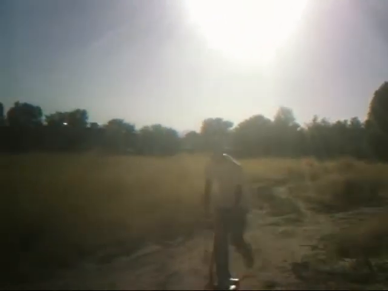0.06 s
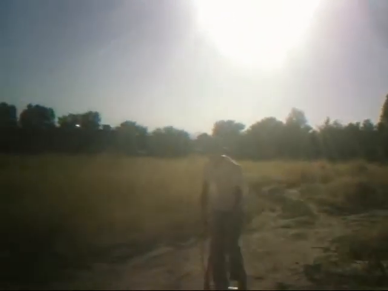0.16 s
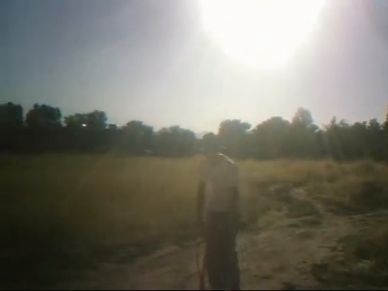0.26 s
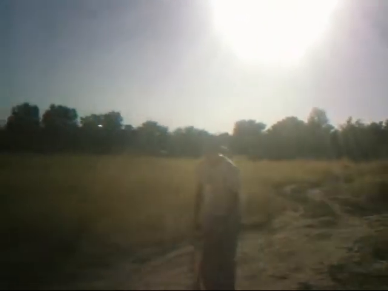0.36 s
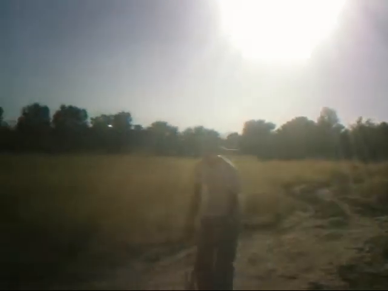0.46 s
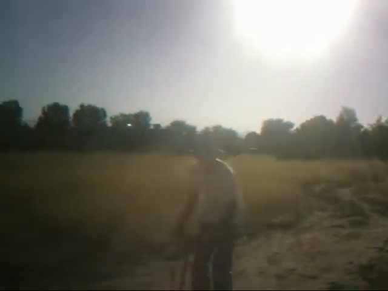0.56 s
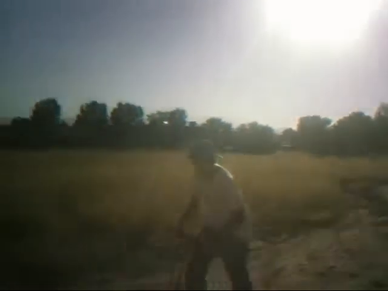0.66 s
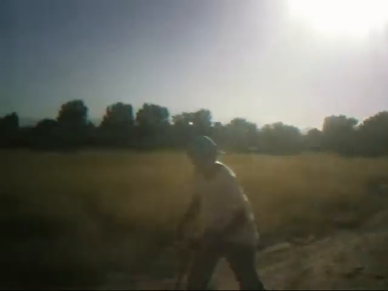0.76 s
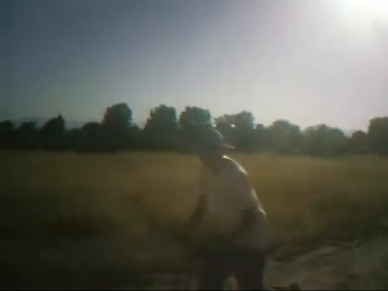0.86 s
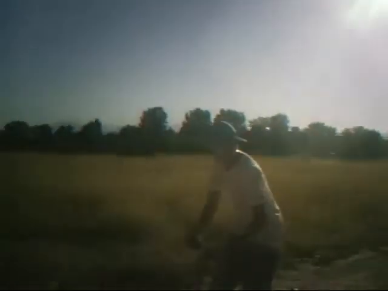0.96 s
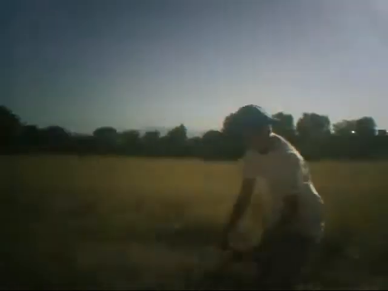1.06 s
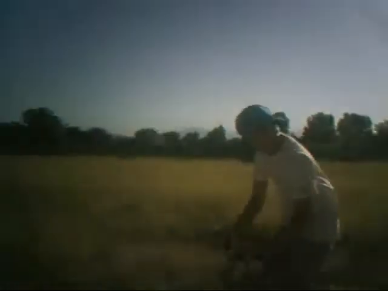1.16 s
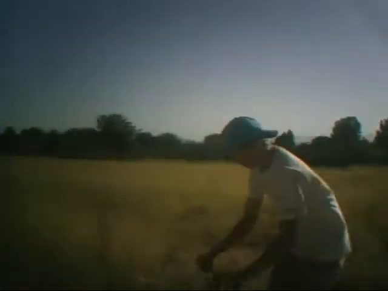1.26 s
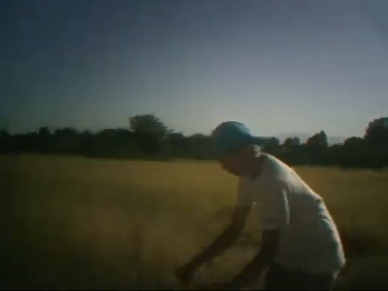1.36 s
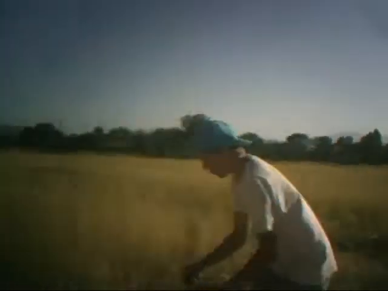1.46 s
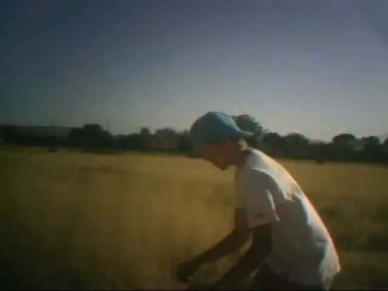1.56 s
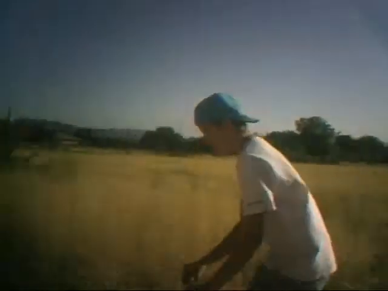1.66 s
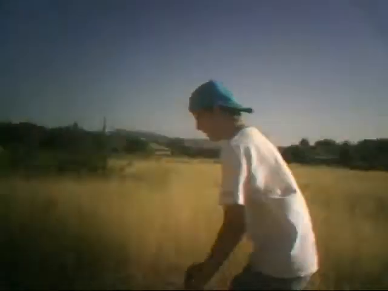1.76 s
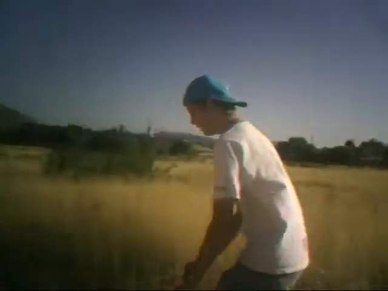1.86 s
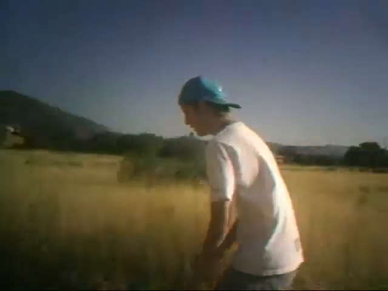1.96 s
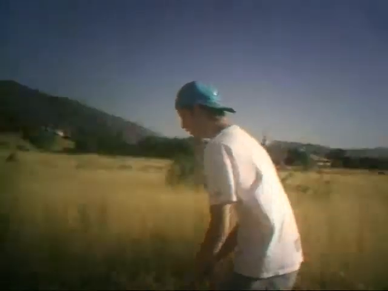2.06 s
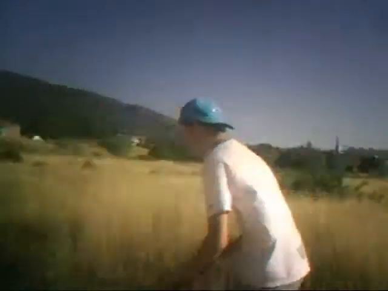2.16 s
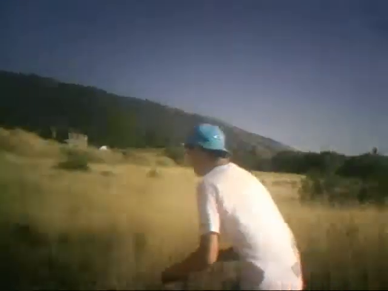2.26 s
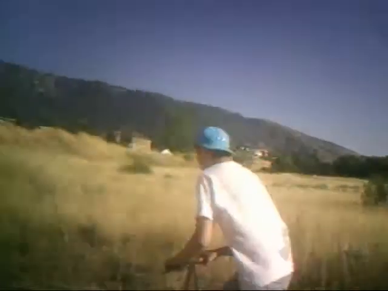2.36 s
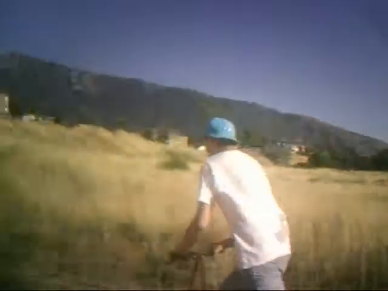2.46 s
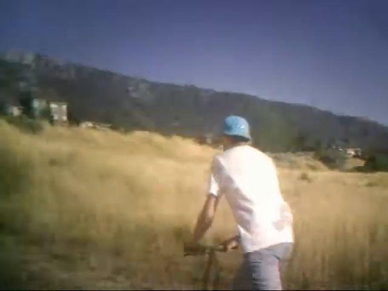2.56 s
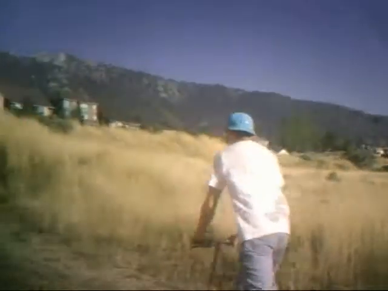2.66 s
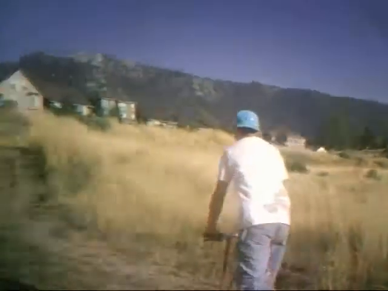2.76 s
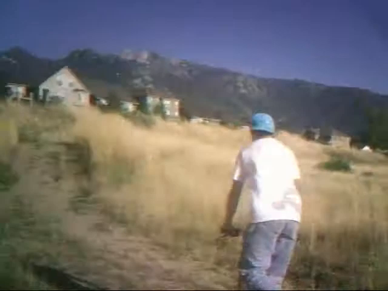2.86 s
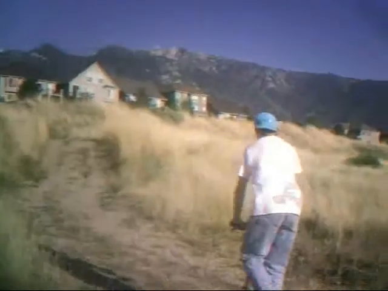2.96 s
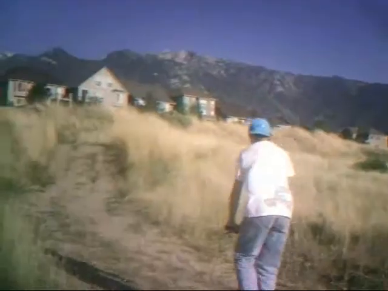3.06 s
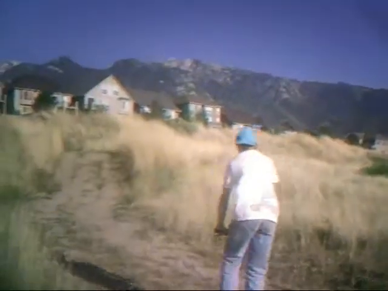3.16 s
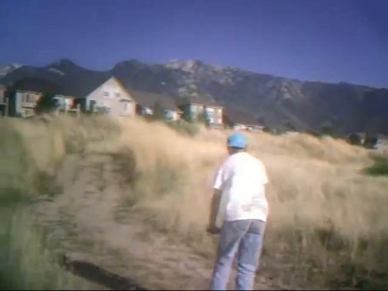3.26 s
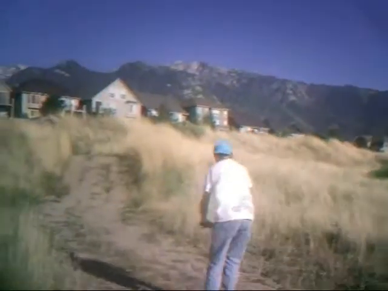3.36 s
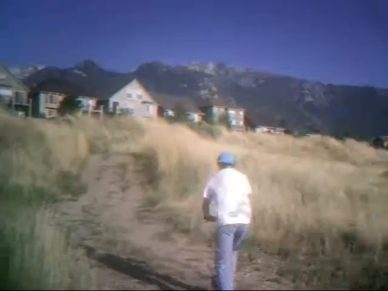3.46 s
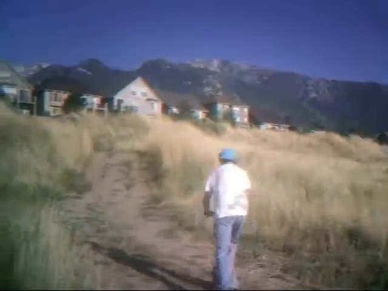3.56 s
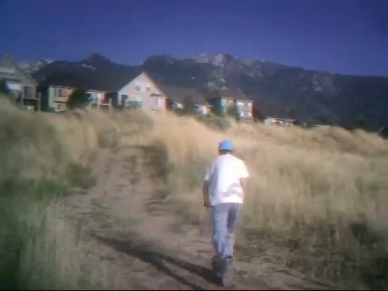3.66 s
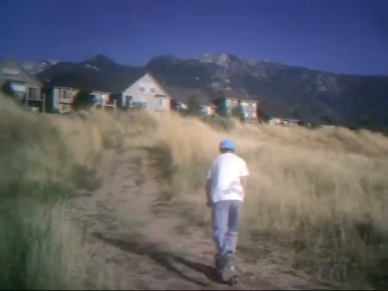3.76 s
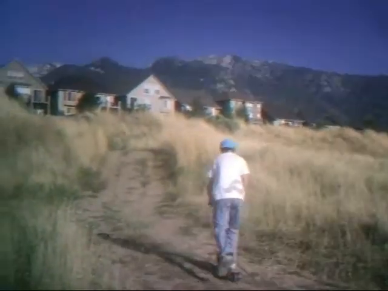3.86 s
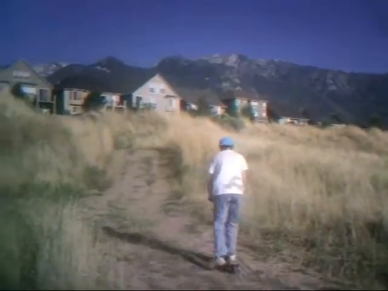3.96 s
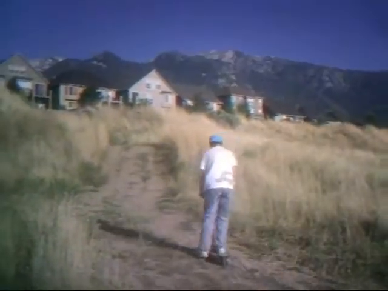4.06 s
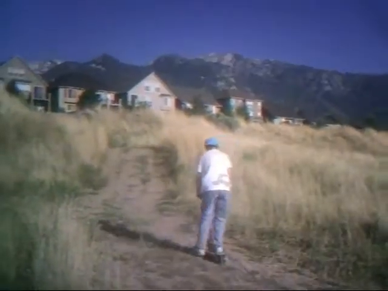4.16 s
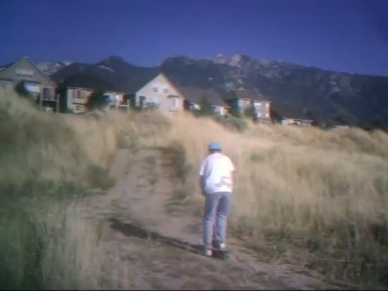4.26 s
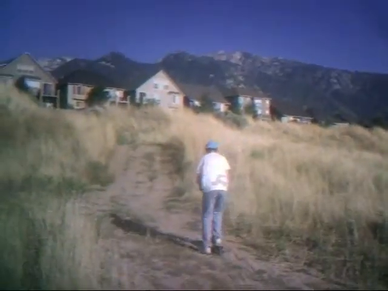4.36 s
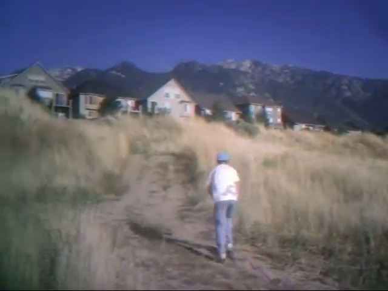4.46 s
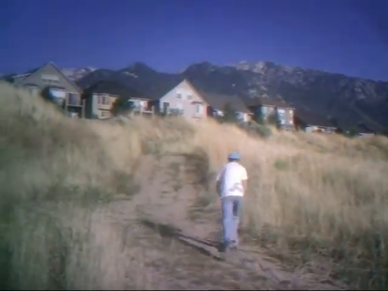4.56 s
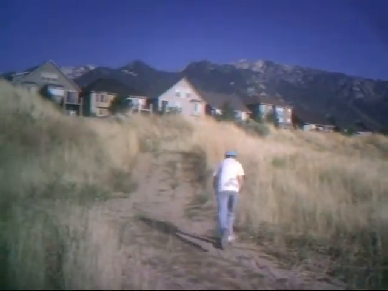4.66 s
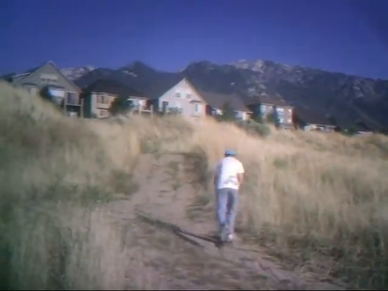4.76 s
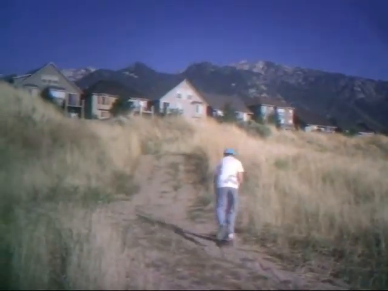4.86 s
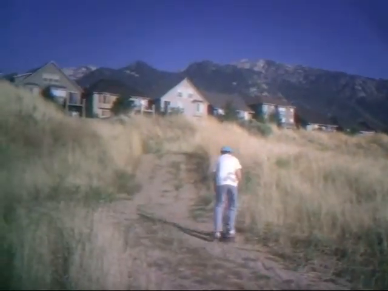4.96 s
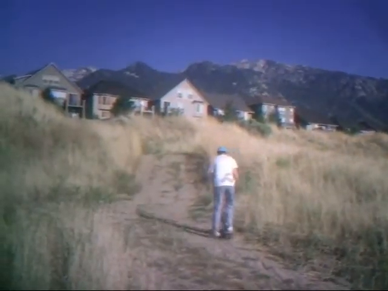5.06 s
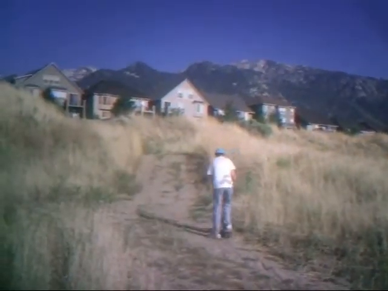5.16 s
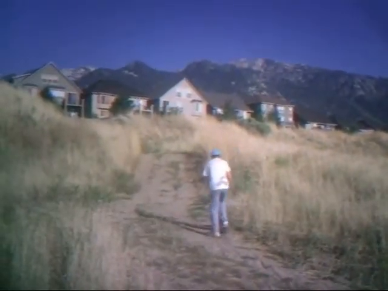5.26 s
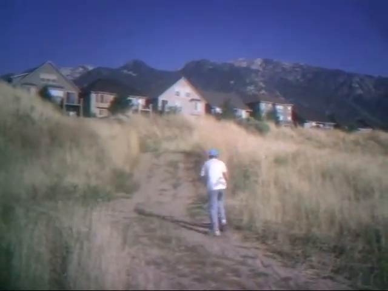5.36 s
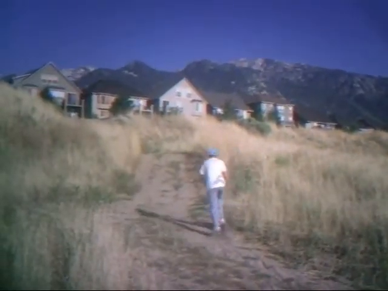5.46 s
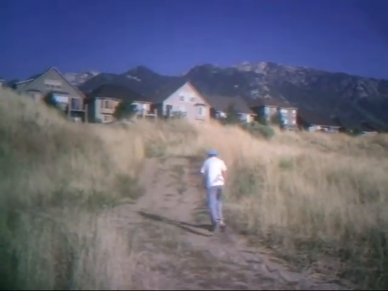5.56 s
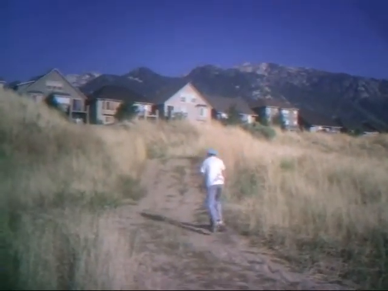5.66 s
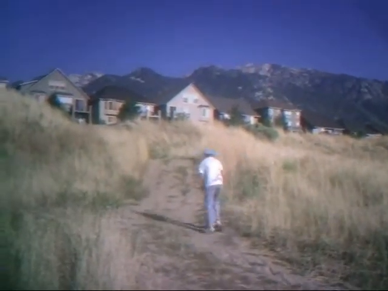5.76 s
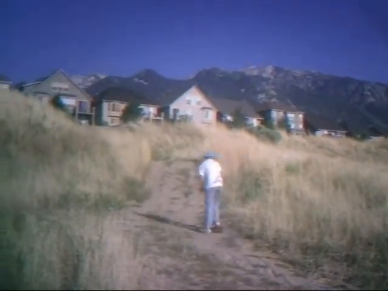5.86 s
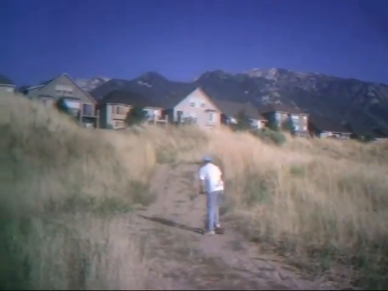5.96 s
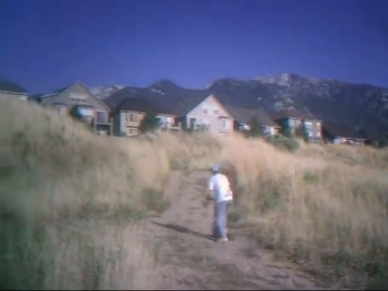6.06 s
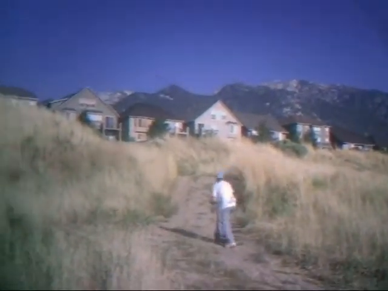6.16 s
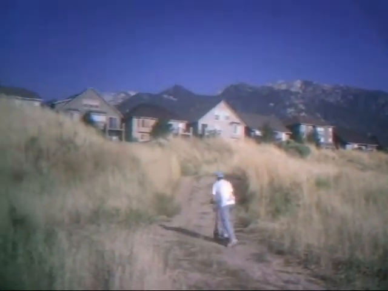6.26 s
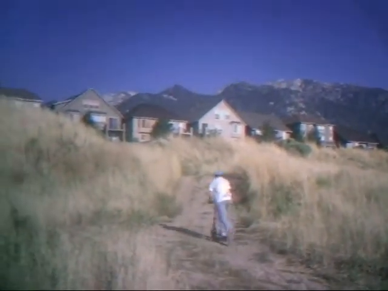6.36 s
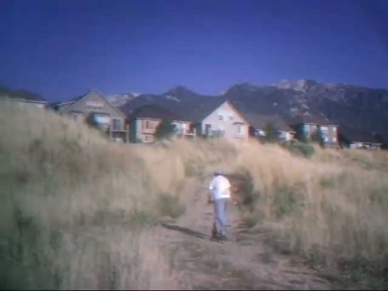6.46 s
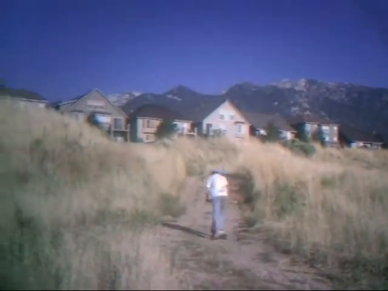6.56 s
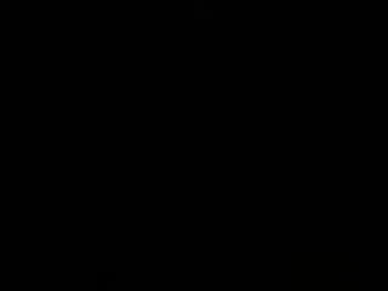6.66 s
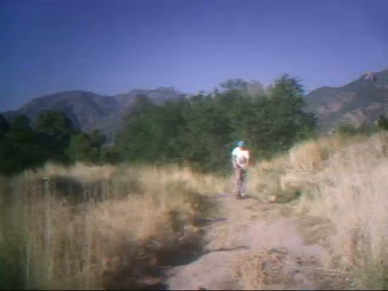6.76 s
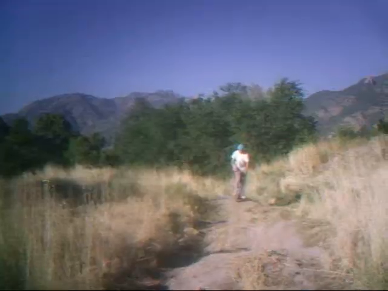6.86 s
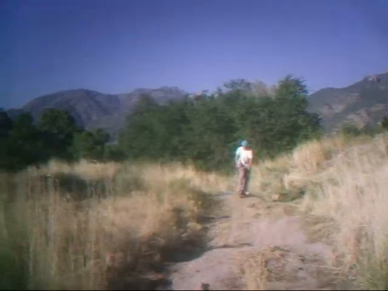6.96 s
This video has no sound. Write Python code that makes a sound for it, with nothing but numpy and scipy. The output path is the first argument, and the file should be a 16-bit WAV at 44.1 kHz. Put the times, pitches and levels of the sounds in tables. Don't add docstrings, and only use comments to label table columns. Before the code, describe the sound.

A small scooter rattles and crunches close past on a stony dirt track, then recedes under a propeller plane's falling drone and buffeting wind.

```python
import sys
import numpy as np
from scipy import signal
from scipy.io import wavfile

SR = 44100
rng = np.random.default_rng(int(sys.argv[2]) if len(sys.argv) > 2 else 0)


def invert_db(level):
    return 10 ** (np.asarray(level, dtype=float) / 20)


def transcribe(signal):
    frames = np.atleast_2d(signal).T
    limited = np.clip(frames, -1, 1)
    pcm = np.round(limited * 32767).astype(np.int16)
    wavfile.write(sys.argv[1], SR, pcm)


N = 308700
T = np.arange(N) / SR
START_S = 6.8243

# t/s, peak level/dB, ring f/Hz
RUT_KNOCKS = [(0.781, -17.5, 540), (0.802, -19, 774), (0.818, -3, 486), (0.835, 0.5, 389), (0.844, -9, 730),
              (0.853, -3, 732), (0.87, -3.5, 436), (0.896, -14.5, 520), (0.912, -13, 590), (0.997, -8, 597),
              (1.006, -7, 433), (1.051, -7.5, 558), (2.417, -2, 429), (2.439, -7, 476),
              (2.461, -8.5, 500.6), (2.477, -15, 518), (2.494, -8, 461), (2.511, -9, 467),
              (2.544, -20, 534)]
# t/s, peak level/dB, ring f/Hz
STONE_KNOCKS = [(0.254, -24, 800), (0.422, -22, 380), (0.701, -10, 362), (1.354, -31, 590),
                (1.558, -3.5, 533), (1.614, -18, 626), (1.699, -8.5, 594), (1.793, -14, 574),
                (1.851, -2.5, 591), (1.865, -20, 622), (1.939, -11.5, 730), (1.972, -11, 565),
                (2.253, -13, 740), (2.319, -16, 738), (2.607, -18, 587), (2.7, -7.5, 620),
                (2.759, -18, 647), (2.879, -25, 610), (2.989, -15, 584), (3.843, -18.5, 450),
                (3.469, -24, 448.4), (3.594, -14.5, 343), (3.656, -18, 450), (3.694, -19, 480),
                (4.253, -29, 629), (4.655, -21, 519.5), (4.985, -27, 920), (5.404, -20, 454),
                (5.756, -24.5, 519), (6.37, -23, 357)]


def evened(x):
    return x / np.sqrt(np.mean(x ** 2) + 1e-20)


def columns(rows):
    s, *values = np.transpose(rows)
    return [np.interp(T, s, v) for v in values]


def add(mix, s, sound):
    part = mix[round(s * SR):][:len(sound)]
    part += sound[:len(part)]


def bell(centre_s, width_s, t=T):
    return np.exp(-((t - centre_s) / width_s) ** 2)


def resonate(x, hz, width):
    return signal.lfilter(*signal.iirpeak(hz, hz / width, SR), x)


def body(x, modes):
    total = 0
    for hz, width, db in modes:
        once = resonate(x, hz, 1.7 * width)
        total = total + invert_db(db) * resonate(once, hz, 1.7 * width)
    return evened(total)


def wander(hz):
    low_pass = signal.butter(2, hz, fs=SR, output="sos")
    return evened(signal.sosfilt(low_pass, rng.standard_normal(N)))


def decay(x, fall_s):
    return signal.lfilter([1], [1, -np.exp(-1 / (fall_s * SR))], x)


def stones(per_s, spread_db, scrape_s):
    size = invert_db(spread_db * np.minimum(rng.exponential(1, N), 4))
    struck = rng.random(N) < per_s / SR
    return evened(decay(size * struck, scrape_s))


def jolts():
    s, db, hz = np.transpose(RUT_KNOCKS + STONE_KNOCKS)
    at = np.round(s * SR).astype(int)
    bend, every = np.zeros(N), np.zeros(N)
    bend[at] = invert_db(db) * np.clip((620 - hz) / 219, 0, 1)
    every[at] = invert_db(db)
    shake_s, spray_s = 0.02, 0.0058
    spray = every - 0.76 * bend
    return decay(bend, shake_s), decay(every, shake_s), decay(spray, spray_s)


def rolling():
    # t/s, nearness level/dB, looseness of the dirt level/dB, flexing of the deck level/dB
    course = [(0, -12.5, 4, 1), (.4, -12.5, 3.5, -2), (.65, -8, 4, 1), (1.0, -2, 1, 2), (1.45, 0.5, -2, -1),
              (2.15, -3, 2, 3.5), (2.5, -2, 0, 2.5), (2.9, -3.5, 2, -3.5), (3.3, -7.5, 0.5, -1.5),
              (3.65, -8, 2, 1), (4.08, -10.5, -3.5, -6), (4.4, -10, 1.5, 0), (4.8, -18, -2.5, 2),
              (5.2, -19.5, 1.5, 2), (5.8, -20, -1, -0.5), (6.22, -17.5, 3, 2), (6.45, -19.5, -4, 3.5),
              (6.73, -21.5, -10, -3)]
    # f/Hz, width/Hz, level/dB
    boom_modes = [(353, 190, -3), (427.4, 145, 1)]
    # f/Hz, width/Hz, level/dB
    ring_modes = [(534.4, 29.5, -3), (590, 32.3, 2.5), (623.7, 22.5, 0)]
    # f/Hz, width/Hz, level/dB
    stem_modes = [(712, 51, 1), (752.4, 46, 7.5), (806, 25, -19)]
    # f/Hz, width/Hz, level/dB
    crunch_modes = [(900, 420, 6.5), (1174, 260, 6.5), (1288, 104, 1)]
    # f/Hz, width/Hz, level/dB
    rim_modes = [(1500, 62, 1.5), (1637, 170, -0.5)]
    # f/Hz, width/Hz, level/dB
    grit_modes = [(2380, 1130, 6), (2746, 185, 1), (3020, 130, 3.5), (3373, 28, 6)]
    near_db, loose_db, flex_db = columns(course)
    bend, shake, spray = jolts()

    def strength(nearest_db, near_share, loose_share, jolt_db, jolt):
        level_db = nearest_db + near_share * near_db + loose_share * loose_db
        return invert_db(level_db + 0.69 * wander(23.7)) + invert_db(jolt_db) * jolt

    boom = strength(-27.5, 0.68, 0.02, -18, bend) * invert_db(flex_db)
    ring = strength(-22.5, 1.3, 0.1, -22.5, shake) / (1 + 4.1 * bend)
    crunch = strength(-30, 0.5, 0.44, -16.5, spray)
    grit = strength(-32.5, 0.81, 1.43, -27, spray) * invert_db(2.5 * wander(30))

    side_on = bell(centre_s=2.07, width_s=0.59)
    hidden = invert_db(-6 * side_on)
    stem = invert_db(-7.5 + 8.5 * side_on)
    rim = invert_db(-2 - 0.6 * (T - 3.14) ** 2)

    bumps = stones(per_s=140, spread_db=2.5, scrape_s=0.005) + 1.2
    sharp = 1 + near_db / 51
    parts = (
        (boom, boom_modes, 0.7), (ring, ring_modes, 0.55), (ring * stem, stem_modes, 0.55),
        (crunch * hidden, crunch_modes, 0.35), (crunch * rim, rim_modes, 0.35), (grit, grit_modes, 0.7))
    total = 0
    for gain, modes, depth in parts:
        force = bumps ** (depth * sharp) * rng.standard_normal(N)
        total = total + gain * body(force, modes)
    return total


def knocks():
    out, t = np.zeros(N), np.arange(6000) / SR
    t60_s = 0.044
    attack = 1 - np.exp(-t / 0.00083)
    for s, db, hz in RUT_KNOCKS + STONE_KNOCKS:
        ring = np.sin(2 * np.pi * hz * t) + 0.35 * np.sin(2 * np.pi * 1.6 * hz * t)
        ring *= -1 - 0.23 * np.exp(-t / 0.00095)
        crack_db = min(-27 - 0.59 * db, -4)
        noise = evened(resonate(rng.standard_normal(len(t)), 930, 1500))
        crack = invert_db(crack_db) * noise * np.exp(-t / 0.0022)
        add(out, s, invert_db(db) * attack * (ring * invert_db(-60 * t / t60_s) + crack))
    return out


def ground_echo(x):
    # far f/Hz, rise when near/Hz, far depth/dB, near depth/dB, centre t/s, width/s
    cancelled = [(1689, 520, 16.5, 5.5, 1.945, 1), (2350, 1100, 16, 5.5, 2.4, 3.04)]
    hz, t, z = signal.stft(x, SR, nperseg=512)
    loss_db = 0
    for row, below_hz, above_hz in zip(cancelled, (70, 260), (190, 240)):
        far_hz, rise_hz, far_db, near_db, centre_s, width_s = row
        near = bell(centre_s, width_s, t)
        off = hz[:, None] - far_hz - rise_hz * near
        depth_db = far_db + (near_db - far_db) * near
        loss_db = loss_db + depth_db * np.exp(-(off / np.where(off < 0, below_hz, above_hz)) ** 2)
    return signal.istft(z * invert_db(-loss_db), SR, nperseg=512)[1][:N]


def blows():
    # t/s, level/dB
    bottomings = [
        (.8716, -5),
        (1.5608, -6),
        (1.8542, -5),
        (2.2555, -13),
        (2.8825, -12),
        (3.468, -17),
        (3.6965, -15),
    ]
    total = 0
    for s, db in bottomings:
        u = ((T - s) / 0.0007) ** 2
        total = total - invert_db(db) * (1 - u) * np.exp(-u)
    return total


def bearings():
    # f/Hz, width/Hz, level/dB
    modes = [(3060, 200, 8.5), (3510, 170, 10)]
    # t/s, level/dB, half length/s
    loads = [
        (5.3, -54, 0.21),
        (6.104, -55, .2),
        (6.545, -51.5, 0.072),
    ]
    level = invert_db(-70) * (T > 4.6)
    level = level + sum(invert_db(db) * bell(s, half_s) for s, db, half_s in loads)
    return level * invert_db(2.0 * wander(24)) * body(rng.standard_normal(N), modes)


def snaps():
    # t/s, level/dB, fall/s
    breaks = [
        (4.3687, -21, 0.0051),
        (5.514, -21.5, 0.0089),
    ]
    # f/Hz, width/Hz, level/dB
    modes = [(830, 400, 8), (1030, 240, 8), (1420, 580, -6), (2070, 448, -2), (3120, 950, -5)]
    envelope = sum(invert_db(db) * (T > s) * np.exp(-abs(T - s) / fall) for s, db, fall in breaks)
    burst = envelope * rng.standard_normal(N)
    return body(burst, modes) * np.sqrt(np.mean(burst ** 2))


def plane():
    # t/s, shaft f/Hz, level/dB
    flight = [(0, 29.6, -1.5), (1.1, 29.54, -0.5), (1.75, 29.62, 2.5), (2.2, 28.92, 0.5), (2.85, 28.05, -1),
              (3.3, 27.02, -1), (3.9, 26.22, -0.5), (4.4, 25.4, 1.5), (5, 25.1, 0), (5.5, 24.11, 1),
              (6.1, 23.57, -1.5), (6.73, 23.22, -2)]
    # multiple, level/dB while nearing, overhead, leaving
    strong = [(2, -38.5, -35.5, -46.5), (3, -52, -32.5, -37), (4, -36.5, -28.5, -36),
              (5, -39.5, -32.5, -34.5)]
    strong_pass = [1.5, 3.16, 6.0]
    # multiple, level/dB while nearing, overhead, leaving
    upper = [(1, -72, -78, -63), (6, -43, -44.5, -40.5), (7, -52, -36, -44), (8, -61, -44, -44),
             (9, -69, -37.5, -52), (10, -58, -42, -58.5), (11, -46.5, -66, -66), (12, -47, -50.5, -49)]
    upper_pass = [1, 4.81, 7.3]
    hz, level_db = columns(flight)
    turns = np.cumsum(hz) / SR
    orders = [(round(k), np.interp(T, strong_pass, db)) for k, *db in strong]
    gone_db = -22 * np.maximum(T - upper_pass[-1], 0)
    orders += [(round(k), np.interp(T, upper_pass, db) + gone_db) for k, *db in upper]
    total = 0
    for k, db in orders:
        phase = k * turns + 0.19 * k ** 2 + 0.057 * wander(2.45)
        gain = np.sqrt(2) * invert_db(db + level_db + 2.0 * wander(6.2))
        total = total + gain * np.sin(2 * np.pi * phase)
    return total


def wind():
    # t/s, strength level/dB
    strength = [(0, -11), (.7, -2), (1.2, -4), (1.7, 1), (2.2, -1.5), (2.9, 1.5), (3.6, -4), (4.5, 0.5),
                (5.25, -5.5), (5.9, -5), (6.36, 3.5), (6.73, -2), (6.83, -11.5), (7, -0.5)]
    # t/s, level/dB, f/Hz, half length/s
    gusts = [
        (0.86, -18, 58.4, 0.021),
        (1.043, -45, 60, .012),
        (1.657, -23, 45, 0.017),
        (1.861, -20, 54.3, 0.017),
        (2.601, -24, 44.7, 0.017),
        (6.111, -24, 90, 0.011),
        (6.353, -12, 60.6, 0.012),
        (6.483, -26, 60, 0.03),
    ]
    strength_db = columns(strength)[0]
    swell = wander(9)
    buffet_gain = invert_db(-39 + strength_db + 2.5 * wander(6.9) + 3 * swell)
    rumble_gain = invert_db(-36.5 + strength_db + 2.5 * wander(6.9) + 1.5 * swell)
    buffet = body(rng.standard_normal(N), [(30, 15, -10.0), (60, 38, -12)])
    rumble = body(rng.standard_normal(N), [(90, 100, 1.5), (177, 39, -7.5)])
    thumps = 0
    for s, db, hz, half_s in gusts:
        envelope = np.exp(-((T - s) / half_s) ** 2 / 2)
        thumps = thumps + invert_db(db) * envelope * np.cos(2 * np.pi * hz * (T - s))
    return buffet_gain * buffet + rumble_gain * rumble + thumps


def field():
    # t/s, level/dB
    wash = [
        (6.83, -55),
        (6.87, -54),
        (6.905, -45),
        (6.915, -45.5),
        (6.96, -44.5),
        (7, -45),
    ]
    # f/Hz, width/Hz, level/dB
    modes = [(350, 320, -14), (654, 380, 15), (900, 110, 12), (1200, 120, -21), (2000, 1800, -8)]
    return invert_db(columns(wash)[0] + 1.3 * wander(22)) * body(rng.standard_normal(N), modes)


def scene():
    track = ground_echo(rolling() + knocks()) + blows() + bearings() + snaps() + plane()
    return (np.where(T < START_S, track, field()) + wind())[None]


def surge(s, db, rise, fall):
    t = np.maximum(T - s, 0)
    return invert_db(db) * (np.exp(-t / fall) - np.exp(-t / rise))


def sample_and_hold(x):
    clock_hz, frames_per_s, slip_ticks = 8000, 30, 0.583
    tick = np.floor(clock_hz * T - slip_ticks * np.floor(frames_per_s * T))
    is_new = np.diff(tick, prepend=-1) > 0
    held = np.maximum.accumulate(np.arange(N) * is_new)
    return np.clip(x[held], -1, 1)


def roll_off(x):
    return signal.sosfilt(signal.butter(12, 15790, fs=SR, output="sos"), x)


def record(dry):
    stop_s, pop_s = 6.7305, 6.8054
    x = signal.sosfilt(signal.butter(8, 3500, fs=SR, output="sos"), dry[0])
    x *= (T < stop_s) + (T > START_S) * np.clip((T - START_S) / 0.016, 0, 1)
    x += 2.6 * surge(pop_s, -0.79, rise=0.00091, fall=0.0017) * (T < START_S)
    x -= surge(START_S, -26.5, rise=0.002, fall=0.05)
    x = signal.oaconvolve(sample_and_hold(x), signal.firwin(511, 15430, fs=SR), "same")
    hiss = body(rng.standard_normal(N), [(300, 1100, -4), (3000, 6000, -14)])
    x += invert_db(-71) * hiss * (T < 6.787)
    return roll_off(x[None])


dry = scene()
out = record(dry)
transcribe(out)
```